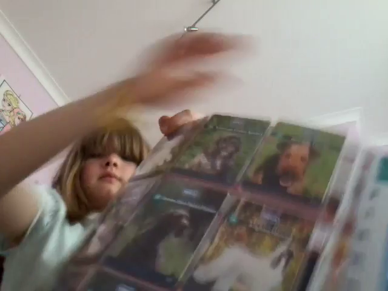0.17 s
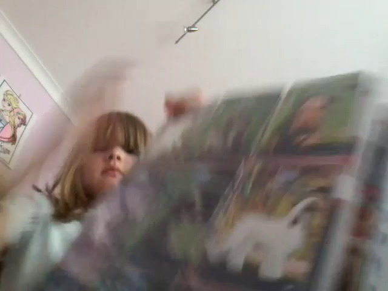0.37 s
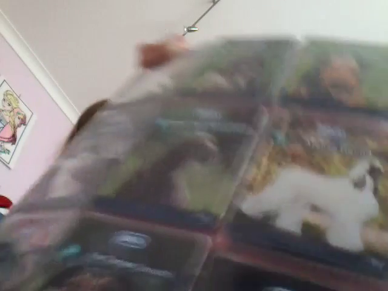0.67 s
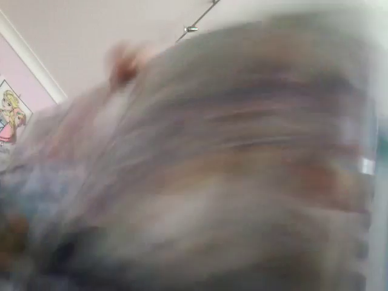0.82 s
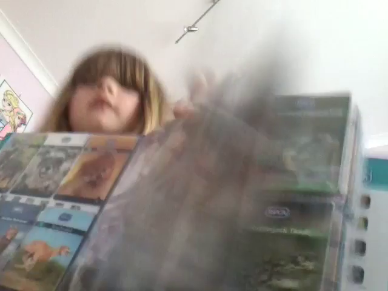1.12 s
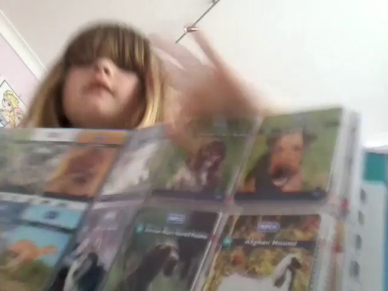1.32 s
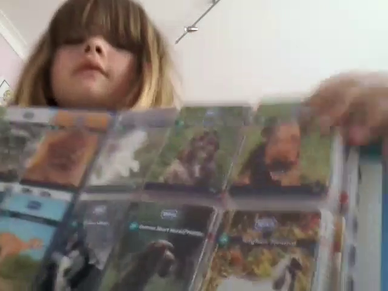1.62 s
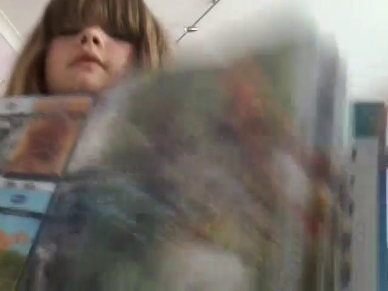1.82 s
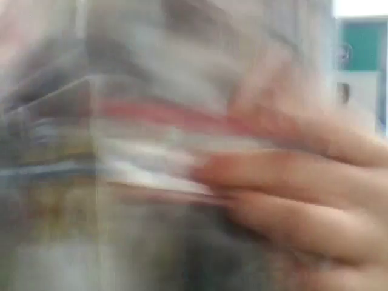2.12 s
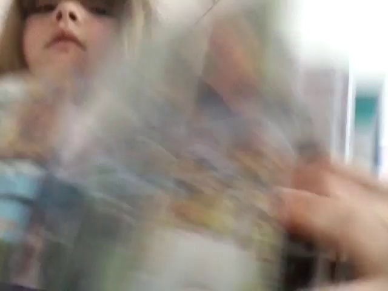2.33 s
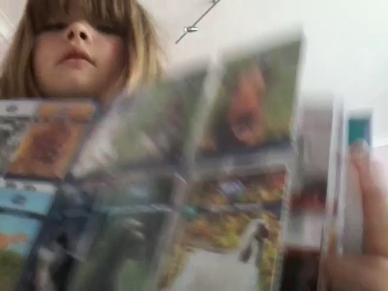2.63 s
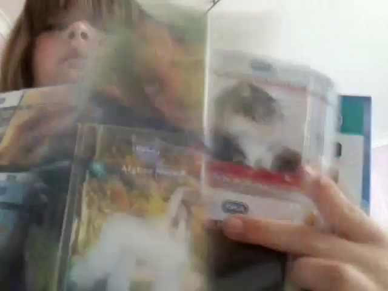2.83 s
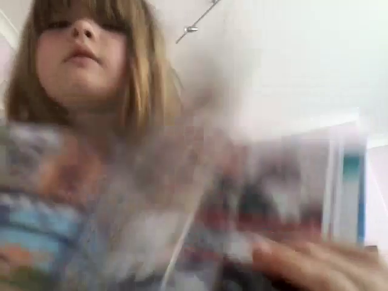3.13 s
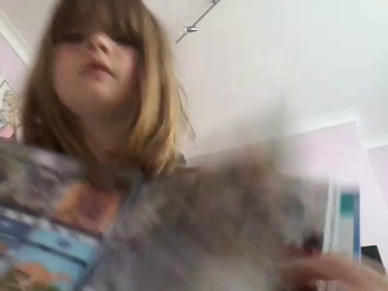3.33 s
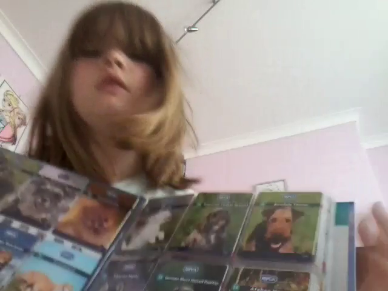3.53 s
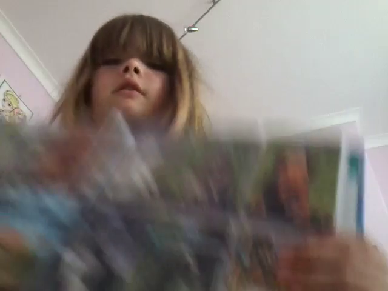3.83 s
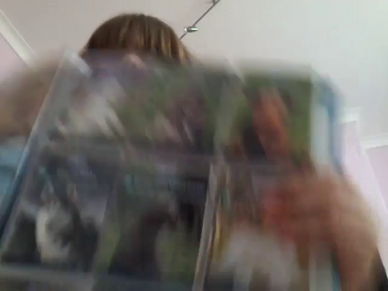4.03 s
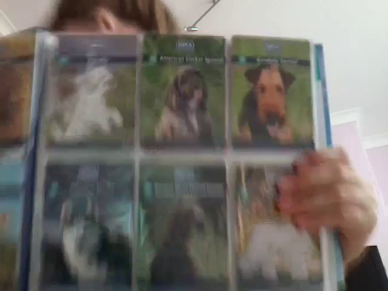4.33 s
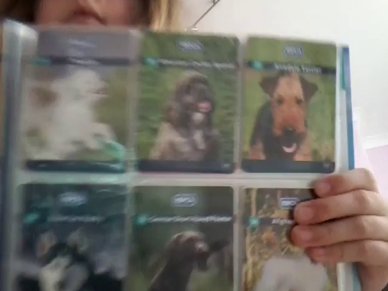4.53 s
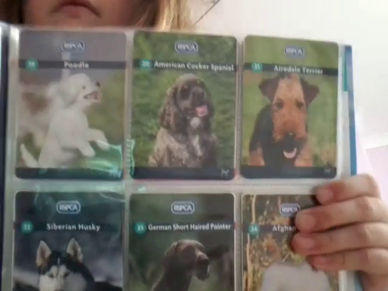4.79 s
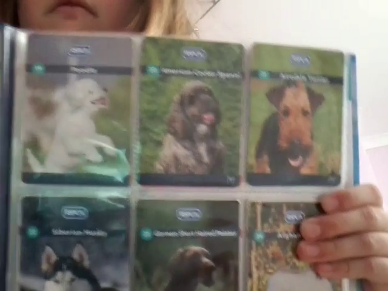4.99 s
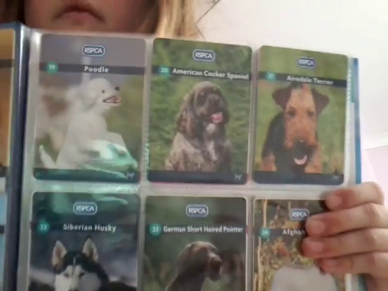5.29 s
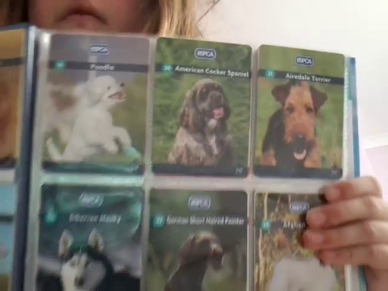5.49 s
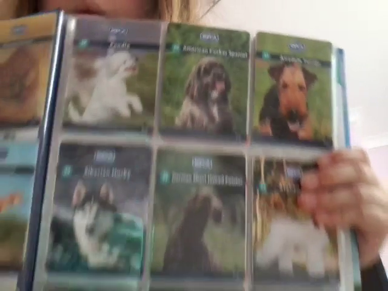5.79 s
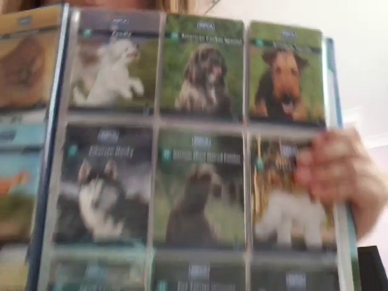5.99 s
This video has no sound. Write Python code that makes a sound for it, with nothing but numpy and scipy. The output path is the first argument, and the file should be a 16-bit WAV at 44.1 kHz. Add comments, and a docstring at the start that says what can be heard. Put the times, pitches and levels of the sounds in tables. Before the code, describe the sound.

Close, bright handling of plastic binder pages filled with cards, in a small bedroom with short reflections, over quiet steady low rumble and faint hiss. It opens with a faint fizz of film and two quick rubbing strokes by 0.2 s. After a lull, a light snap comes at about 0.7 s, and fuller flexing, scraping and crackling runs from 0.8 to 1.4 s. Softer rubs and ticks continue until creases crowd into a hard snap and page slap at 2.15 s, trailing crackles. Rustling thins, then the loudest, overloaded crack and heavy slap lands at 2.84 s with a puff of air. Swishing film follows to 3.2 s, where another snap sounds, with smaller clicks near 3.5 and 3.7 s. A rising, hoarse drag of taut plastic stops abruptly at 4.3 s. Afterwards it is nearly still, with small crinkles around 5.05, 5.5 and 5.6 s and a faint final glide.

```python
"""A faint fizz of rubbing film comes first, soon with sharper strokes and a light snap: plastic sleeve pages
full of cards are lifted, bent and turned in a binder, close to a small stereo camera in a bedroom.
Stick-slip clicks make the fizz, scrape and swishes; creases buckle as short ringing pulses; two heavy pages
slap down as decaying noise with a puff of air. The room answers briefly over steady rumble and hiss;
each microphone port rings at its own treble pitch, and the hardest snaps overload."""
import sys
import numpy as np
from scipy import signal
from scipy.fft import rfft, irfft, next_fast_len
from scipy.io import wavfile
from scipy.ndimage import map_coordinates

SR = 44100
rng = np.random.default_rng(int(sys.argv[2]) if len(sys.argv) > 2 else 0)


def log_audio(samples):
    """Write samples as a 16-bit WAV file to the path given in sys.argv[1]."""
    # one column per channel
    frames = np.atleast_2d(samples).T
    # limit to full scale, then quantise
    limited = np.clip(frames, -1, 1)
    pcm = np.round(limited * 32767).astype(np.int16)
    wavfile.write(sys.argv[1], SR, pcm)


N = 271215
TIME = np.arange(N) / SR

# the page lies to one side: lag of the right port, and its spread from crease to crease
LAG_MS, LAG_SPREAD_MS = .21, .1

SWELL_DB = 20  # a push gains this much over its rise and loses it over its fall
FLEX_SLOWER = 1.25  # the heavy page starts and stops more slowly than the film slides
HELD_FIZZ_DB, HELD_FLEX_DB = -76, -76  # the binder stirs even when only held

# pushes of the hand that slide and bend a page, levels before the mix: peak t/s, film rise t/s, film fall t/s,
# fizz level/dB, flex level/dB, scrape relative to fizz level/dB, left minus right level/dB
HAND_PUSHES = [(0.004, 0.101, 0.226, -56.5, -63.8, -12.0, -0.1),
               (0.139, 0.037, 0.014, -37.6, -52.6, -18.0, -1.0),
               (0.2, 0.051, 0.016, -33.3, -50.9, -18.0, -1.2),
               (0.426, 0.428, 0.206, -57.6, -58.6, -17.0, -0.2),
               (0.531, 0.014, 0.128, -50.1, -47.3, -16.0, -0.7),
               (0.674, 0.123, 0.065, -42.2, -45.2, -14.0, -1.6),
               (0.875, 0.11, 0.17, -37.5, -40.0, -8.0, -1.5), (0.945, 0.13, 0.075, -35.5, -46.0, -3.0, 1.0),
               (1.138, 0.096, 0.134, -43.3, -46.7, -8.0, -0.9),
               (1.274, 0.02, 0.199, -39.6, -44.8, -10.0, -0.2),
               (1.501, 0.126, 0.099, -42.2, -57.5, -26.0, -0.3),
               (1.604, 0.149, 0.228, -49.8, -61.2, -23.0, 1.3),
               (1.755, 0.109, 0.087, -42.3, -50.9, -10.0, -0.7),
               (1.901, 0.081, 0.621, -53.8, -55.3, -6.0, -0.9),
               (2.086, 0.012, 0.14, -40.5, -38.0, 1.0, -1.0),
               (2.144, 0.027, 0.049, -28.5, -31.3, -9.0, -0.1),
               (2.369, 0.559, 0.475, -49.8, -51.3, -19.0, -0.9),
               (2.563, 0.044, 0.094, -45.4, -45.1, -5.0, 0.9),
               (2.79, 0.01, 0.03, -39.0, -36.0, -17.0, -1.0),
               (2.858, 0.022, 0.068, -21.0, -26.5, -20.0, -2.0),
               (3.009, 0.146, 0.074, -32.3, -36.8, -14.0, -2.2),
               (3.131, 0.032, 0.072, -40.1, -45.5, -10.0, -4.1),
               (3.216, 0.067, 0.433, -53.0, -51.5, -10.0, -2.0),
               (3.475, 0.025, 0.083, -37.8, -45.9, -7.0, -1.2),
               (3.69, 0.006, 0.037, -44.4, -49.4, -5.0, -1.8), (3.751, 0.2, 0.45, -65.0, -64.0, -8.0, 2.0),
               (3.999, 0.134, 0.117, -49.5, -55.0, -9.0, -0.3),
               (4.324, 0.066, 0.02, -29.5, -44.0, -13.0, -2.0),
               (4.442, 0.531, 0.525, -63.5, -65.8, -8.0, 3.2),
               (4.949, 0.021, 0.091, -57.7, -63.7, -11.0, 2.1),
               (5.08, 0.061, 0.053, -43.4, -54.7, -17.0, -1.5),
               (5.15, 0.073, 0.234, -60.2, -66.7, -7.0, 4.4),
               (5.511, 0.058, 0.073, -51.8, -61.4, -11.0, 0.6),
               (5.623, 0.081, 0.36, -51.5, -58.0, -8.0, 1.0)]


def handling():
    """Power addition of incoherent sources: overlapping pushes set the fizz, scrape and flex gains per port."""
    fizz_power, scrape_power, flex_power = np.zeros((3, 2, N))
    for peak_s, rise_s, fall_s, fizz_db, flex_db, scrape_db, pan_db in HAND_PUSHES:
        pan = panned(pan_db)
        slide = (swell(peak_s, rise_s, fall_s, fizz_db) * pan) ** 2
        bend = (swell(peak_s, rise_s * FLEX_SLOWER, fall_s * FLEX_SLOWER, flex_db) * pan) ** 2
        fizz_power += slide
        scrape_power += slide * amp(scrape_db) ** 2
        flex_power += bend
    fizz = np.sqrt(fizz_power + amp(HELD_FIZZ_DB) ** 2)
    flex = np.sqrt(flex_power + amp(HELD_FLEX_DB) ** 2)
    return fizz, np.sqrt(scrape_power), flex


# relative spectrum of film sliding on film: f/Hz, level/dB per Hz
FIZZ_SPECTRUM = [(300, -35), (1200, -21), (2400, -4), (3200, -8), (4600, -1.5), (5800, -3.5), (7000, -1.3),
                 (8500, -2), (11000, 2), (14500, 2)]
# relative spectrum of scraping card edges: f/Hz, level/dB per Hz
SCRAPE_SPECTRUM = [(300, -16.5), (1000, -14), (1600, -1), (2300, -2), (3000, .5), (4200, 0), (6000, -11),
                   (12000, -14.5)]
# relative spectrum of the flexing card-filled page: f/Hz, level/dB per Hz
FLEX_SPECTRUM = [(40, -32.5), (130, -3.5), (300, -1), (700, -2.2), (1300, -9), (2000, -14), (4000, -17),
                 (10000, -42)]


def rubbing(fizz_gain, scrape_gain, flex_gain):
    """Stick-slip friction: film slides in uneven spurts, card edges scrape and the heavy page flexes."""
    spurt = amp(1.9 * wander(per_s=140))  # rms swing in dB
    fizz_slips = slips(per_s=1700, spread_db=3, smooth=0.39)
    scrape_slips = slips(per_s=900, spread_db=4, smooth=.45)
    flex_slips = slips(per_s=400, spread_db=1.0, smooth=0.63)
    fizz = at_ports(shaped(fizz_slips, FIZZ_SPECTRUM), LAG_MS, diffuse=0.96)
    scrape = at_ports(shaped(scrape_slips, SCRAPE_SPECTRUM), LAG_MS, diffuse=0.44)
    flex = at_ports(shaped(flex_slips, FLEX_SPECTRUM), LAG_MS, diffuse=0.18)
    driven = fizz * fizz_gain + scrape * scrape_gain + flex * flex_gain
    return amp(-3.2) * spurt * driven


def slips(per_s, spread_db, smooth):
    """Stick-slip: three trains of tiny random clicks, a few of them large, over smooth sliding noise."""
    size = amp(spread_db * np.minimum(rng.exponential(1, (3, N)), 4))
    happens = rng.random((3, N)) < per_s / SR
    clicks = size * happens * rng.choice([-1, 1], (3, N))
    return evened(clicks) + smooth * rng.standard_normal((3, N))


# single buckling creases, from faint ticks to hard snaps, level of the direct pulse before panning:
# t/s, energy level/dB, panel ring f/Hz, flip corner f/Hz, lag of the right port t/ms, left minus right level/dB
SINGLE_SNAPS = [(0.1149, -20.2, 2110.0, 20000.0, 0.16, -2.0), (0.6359, -22.1, 1240.0, 3500.0, 0.12, -1.0),
                (0.6583, -22.1, 590.0, 8900.0, 0.12, 4.0), (0.6811, -9.0, 1500.0, 1800.0, 0.26, 0.0),
                (0.8303, -13.5, 1900.0, 1000.0, 0.3, -1.0), (0.9244, -16.2, 730.0, 7900.0, -0.14, -1.0),
                (0.9847, -20.0, 1120.0, 11000.0, 0.2, 2.0), (1.0114, -15.0, 500.0, 9000.0, 0.15, 2.0),
                (1.1145, -24.4, 1120.0, 2200.0, 0.18, 4.0), (1.1724, -29.0, 1720.0, 3270.0, 0.2, -4.0),
                (1.2755, -25.3, 910.0, 14100.0, 0.06, 0.0), (1.3415, -22.4, 350.0, 20000.0, 0.1, -2.0),
                (1.3729, -12.5, 350.0, 20000.0, 0.12, 3.0), (1.5836, -25.6, 500.0, 2200.0, 0.12, -3.0),
                (1.6951, -26.8, 2350.0, 20000.0, 0.28, -4.0), (1.7739, -21.7, 3580.0, 20000.0, 0.28, 4.0),
                (1.8736, -24.7, 1380.0, 900.0, 0.02, -1.0), (1.9202, -16.0, 2900.0, 20000.0, 0.06, -6.0),
                (1.9877, -16.5, 350.0, 3500.0, 0.2, -5.0), (2.0324, -12.0, 1540.0, 20000.0, -0.02, 2.0),
                (2.0792, -6.0, 350.0, 20000.0, 0.2, 2.0), (2.0927, -15.8, 1010.0, 11200.0, 0.18, 3.0),
                (2.1113, -10.8, 350.0, 4500.0, 0.24, 4.0), (2.1397, 6.0, 6500.0, 20000.0, -0.12, -1.0),
                (2.1493, 0.0, 430.0, 2900.0, 0.25, 3.0), (2.1726, -7.0, 550.0, 700.0, 0.36, 1.0),
                (2.1836, -10.5, 660.0, 700.0, 0.32, -6.0), (2.1943, -8.5, 1120.0, 7100.0, 0.12, 0.0),
                (2.2156, -13.1, 590.0, 1400.0, 0.26, 1.0), (2.2385, -6.8, 430.0, 8900.0, 0.26, 2.0),
                (2.2781, -15.5, 450.0, 5500.0, 0.22, 5.0), (2.3378, -18.3, 820.0, 12600.0, 0.2, 2.0),
                (2.3878, -21.7, 730.0, 2500.0, 0.2, -2.0), (2.3932, -21.0, 1120.0, 2200.0, 0.14, 4.0),
                (2.4369, -27.6, 1380.0, 700.0, 0.18, 11.0), (2.4857, -22.8, 1010.0, 700.0, 0.2, 0.0),
                (2.5289, -13.0, 530.0, 8900.0, 0.18, -1.0), (2.5558, -16.4, 530.0, 8900.0, 0.12, 2.0),
                (2.7364, -25.0, 700.0, 700.0, 0.2, -2.0), (2.7953, -10.0, 6750.0, 1200.0, 0.2, 3.0),
                (2.8293, -10.3, 1380.0, 700.0, 0.18, 3.0), (2.8408, 3.0, 820.0, 10000.0, 0.14, -1.0),
                (2.8434, 12.5, 5400.0, 15000.0, 0.1, -1.0), (2.8451, 6.0, 400.0, 20000.0, 0.1, 1.0),
                (2.8619, -1.0, 730.0, 7000.0, -0.04, -2.0), (2.9295, -10.0, 590.0, 4500.0, 0.24, 1.0),
                (2.9671, -11.7, 590.0, 5000.0, 0.08, -3.0), (2.9989, -14.3, 730.0, 4000.0, 0.2, -2.0),
                (3.2266, -5.0, 950.0, 2700.0, 0.2, -1.0), (3.4723, -17.0, 3220.0, 20000.0, 0.3, -1.0),
                (3.4779, -9.3, 2900.0, 2000.0, 0.06, -3.0), (3.4828, -12.2, 350.0, 20000.0, 0.16, -4.0),
                (3.6944, -23.4, 350.0, 5000.0, 0.06, -2.0), (3.9036, -37.0, 2000.0, 1500.0, 0.2, -2.0),
                (4.6223, -42.0, 1000.0, 10000.0, 0.16, -2.0), (4.9433, -25.5, 600.0, 5600.0, 0.2, 1.0),
                (5.0152, -26.0, 1200.0, 6000.0, 0.26, 1.0), (5.0296, -24.6, 2500.0, 20000.0, 0.16, 1.0),
                (5.0793, -22.3, 7500.0, 1100.0, -0.32, -5.0), (5.5158, -28.8, 4420.0, 20000.0, -0.02, -2.0),
                (5.6311, -28.0, 1500.0, 14000.0, 0.06, -2.0)]


def snaps(q=1.7, gentle_q=1.3, bounce_db=-9):
    """Snap-through buckling: the gentler the flip, the purer the ring; the card behind throws each one back."""
    out = np.zeros((2, N))
    for s, db, hz, flip_hz, lag_ms, pan_db in SINGLE_SNAPS:
        pulse = crease(hz, flip_hz, lag_ms, q + gentle_q * min(hz / flip_hz, 1))
        sheet = shiver(ring_db=-10, ring_t60=0.017)
        bounce_s = rng.uniform(.0003, .0008)
        sheet[:, round(bounce_s * SR)] += amp(bounce_db)
        snap = signal.fftconvolve(pulse, sheet, axes=1)
        add(out, s - 16 / SR, amp(db) * panned(pan_db) * snap)  # undoes the lead-in of crease()
    return out


def crease(hz, flip_hz, lag_ms, q, size=512):
    """Damped resonance: a panel flips and rings a few cycles, a slow flip dully. Unit energy at the left port."""
    f = np.fft.rfftfreq(size, 1 / SR)
    panel, flip = 1j * f / hz, 1j * f / flip_hz
    ring = panel ** 2 / (1 + panel / q + panel ** 2)
    flip_low_pass = 1 / (1 + np.sqrt(2) * flip + flip ** 2)
    band_limit = 1 / (1 + (f / EDGE_HZ) ** 16)
    delay = 16 / SR + np.array([[-.5], [.5]]) * lag_ms / 1000  # 16 samples of lead-in
    pulse = irfft(ring * flip_low_pass * band_limit * np.exp(-2j * np.pi * f * delay))
    return pulse / np.linalg.norm(pulse[0])


def shiver(ring_db, ring_t60, size=1024):
    """Exponential decay: a direct unit pulse, then the brief rattle of the sheet around it."""
    sheet = rng.standard_normal((2, size)) * amp(-60 * np.arange(size) / SR / ring_t60)
    sheet *= amp(ring_db) / np.linalg.norm(sheet[0])
    sheet[:, 0] = 1
    return sheet


# pages landing on the stack: t/s, thud energy level/dB, t60 t/s, puff energy level/dB (both at the left port)
PAGE_SLAPS = [(2.147, .5, 0.11, -25), (2.843, -1.5, 0.22, -5)]
# relative spectrum of the thud: f/Hz, level/dB per Hz
SLAP_SPECTRUM = [(20, -8), (60, -12.5), (130, -3), (230, -4), (500, 8.5), (1000, 0.5), (2000, -12),
                 (6000, -21.5)]


def slaps(apart=0.26, push_s=0.0023):
    """Impact and air displacement: the cards thud into the stack and push a puff of air onto the ports."""
    out, t = np.zeros((2, N)), np.arange(SR // 2) / SR
    puff = (1 - t / push_s) * np.exp(-t / push_s) * np.array([[1], [-.5]])
    puff /= np.linalg.norm(puff[0])
    for s, db, t60, puff_db in PAGE_SLAPS:
        # mostly shared by the ports, partly each port's own
        noise = rng.standard_normal(len(t)) + apart * rng.standard_normal((2, len(t)))
        thud = shaped(noise, SLAP_SPECTRUM) * amp(-60 * t / t60)
        add(out, s, amp(db) * thud / np.linalg.norm(thud[0]) + amp(puff_db) * puff)
    return out


# a bent page relaxes in small dull pops: peak t/s, rise t/s, fall t/s, peak level/dB before the bend weighting
RELAXING = (2.45, .5, .9, -60)


def small_creases(fizz, flex):
    """Buckling threshold: dull flaps follow the flexing, bright ticks the sliding; a barely bent page is quiet."""
    bent = flex / (flex + amp(-64))
    flaps = crinkle(per_s=57, spread_db=4, low_hz=523, high_hz=1700, reach=0.77, q=3)
    ticks = crinkle(per_s=70, spread_db=1.4, low_hz=1200, high_hz=6030, reach=3, q=1.6)
    flaps = flaps * (amp(-8.5) * flex + swell(*RELAXING))
    ticks = ticks * amp(-11.5) * fizz
    return signal.oaconvolve(bent * (flaps + ticks), shiver(ring_db=-7, ring_t60=.018), axes=1)[:, :N]


def crinkle(per_s, spread_db, low_hz, high_hz, reach, q, count=24):
    """Random-impulse noise: small creases of many sizes pop, each with its flip corner at reach times its pitch."""
    out = np.zeros((2, N))
    size = amp(spread_db * np.minimum(rng.exponential(1, N), 3))
    size = size * (rng.random(N) < per_s / SR)
    which = rng.integers(0, count, N)
    shapes = []
    for hz in np.geomspace(low_hz, high_hz, count):
        shapes.append(crease(hz, hz * reach, rng.normal(LAG_MS, LAG_SPREAD_MS), q))
    for i in np.flatnonzero(size):
        add(out, i / SR, size[i] * shapes[which[i]])
    return evened(out)


# a sleeve dragged taut whistles hoarsely: peak t/s, rise t/s, fall t/s, peak level/dB
TAUT_DRAG = (4.324, .06, .016, -40)
# its resonances: f/Hz, width f/Hz, relative level/dB
TAUT_MODES = [(450, 360, -8), (2170, 340, -2), (2724, 420, -4.5)]


def drag():
    """Friction-driven resonance: dense slips ring the modes of a taut sleeve."""
    drive, out = slips(per_s=4000, spread_db=3, smooth=0.4), 0
    for hz, width, db in TAUT_MODES:
        band = signal.iirpeak(hz, hz / width, SR)
        out = out + amp(db) * evened(signal.lfilter(*band, drive))
    return at_ports(evened(out), LAG_MS, diffuse=0.2) * swell(*TAUT_DRAG)


# one smooth sleeve glides over another: start t/s, end t/s, level/dB
GLIDES = [(1.45, 1.54, -49), (1.898, 1.975, -59), (2.572, 2.65, -51.5), (2.93, 3.062, -42.5),
          (3.117, 3.182, -44), (3.96, 4.1, -65), (5.61, 5.87, -62.5)]
# relative spectrum of its fine hiss: f/Hz, level/dB per Hz
GLIDE_SPECTRUM = [(1000, -34), (3800, -18.5), (5000, -7.5), (5750, -1.5), (6500, -6), (8500, -5.5),
                  (14000, -6.5)]


def swishes(taper=.7):
    """Fine-grained friction: very fast slips swell and stop with each glide."""
    level = np.zeros((1, N))
    for start, end, db in GLIDES:
        length = max(round((end - start) * SR), 2)
        add(level, start, amp(db) * signal.windows.tukey(length, taper)[None])
    fine_slips = slips(per_s=5000, spread_db=3.5, smooth=.6)[:2]
    return level * shaped(fine_slips, GLIDE_SPECTRUM)


def scene():
    """Superposition: pushes drive rubbing and small creases, snaps and slaps are added, the room answers."""
    fizz, scrape, flex = handling()
    rustle = rubbing(fizz, scrape, flex) + drag() + swishes() + small_creases(fizz, flex)
    hits = snaps() + slaps()
    return rustle + hits + amp(-9.5) * room(rustle) + amp(-15) * room(hits)


# reverberation of the bedroom: f/Hz, t60 t/s
BEDROOM = [(150, .45), (700, 0.19), (2000, 0.36), (6000, 0.29), (14000, 0.48)]


def room(x, first_s=0.0064):
    """Reverberation: a dense tail of reflections, fading in around first_s, each band dying at its own speed."""
    hz, t, z = signal.stft(rng.standard_normal((2, SR // 2)), SR, nperseg=256)
    decay = amp(-60 * t / read(BEDROOM, hz)[:, None])
    tail = signal.istft(z * decay, SR, nperseg=256)[1]
    tail *= np.clip(np.arange(tail.shape[1]) / SR / first_s - .5, 0, 1)
    return signal.fftconvolve(x, tail / np.linalg.norm(tail[0]), axes=1)[:, :N]


# relative spectrum of the steady rumble and hiss: f/Hz, level/dB per Hz
HUSH_SPECTRUM = [(15, -7.5), (40, -3.5), (85, 3), (150, -0.5), (300, -8.5), (600, -16.5), (1200, -22),
                 (3000, -28.5), (6000, -41), (9000, -25), (14500, -21)]


def hush():
    """Stationary noise: steady rumble and hiss, independent at the ports and 2 dB stronger at the left."""
    return amp(-63) * shaped(rng.standard_normal((2, N)), HUSH_SPECTRUM) * amp([[1], [-1]])


BAND_HZ, EDGE_HZ = 14500, 15500  # band limits before and after the overload
# microphone ports, left then right: resonance f/Hz, sharpness Q, gain level/dB, treble roll-off f/Hz
MIC_PORTS = [(7444, 2.6, 1, 170000), (5826, 7.2, -1.5, 20000)]


def record(dry):
    """Port resonance and clipping: two ports of opposite polarity, background noise, overload, band limit."""
    size = next_fast_len(N + 2048)
    f = np.fft.rfftfreq(size, 1 / SR)
    ports = []
    for hz, q, db, top_hz in MIC_PORTS:
        resonance = 1 / (1 - (f / hz) ** 2 + 1j * f / hz / q)
        ports.append(amp(db) * resonance / (1 + 1j * f / top_hz))
    heard = irfft(rfft(dry, size) * np.array(ports), size)[:, :N] * np.array([[1], [-1]])
    overloaded = np.clip(low_pass(heard + hush(), BAND_HZ), -1, 1)
    return low_pass(overloaded, EDGE_HZ)


def low_pass(x, hz):
    """Band limiting: a steep elliptic filter."""
    return signal.sosfilt(signal.ellip(10, .1, 70, hz, fs=SR, output="sos"), x)


def at_ports(x, lag_ms, diffuse):
    """Direct and diffuse field: the touched spot lags at the right port; the rest of the page is uncorrelated."""
    spot, left, right = x
    late = map_coordinates(spot, [np.arange(N) - lag_ms * SR / 1000], order=3)
    share = np.clip(diffuse, 0, 1)
    return np.sqrt(1 - share) * np.array([spot, late]) + np.sqrt(share) * np.array([left, right])


def panned(db):
    """Level difference between the ports: left minus right, split evenly."""
    return amp(np.array([[.5], [-.5]]) * db)


def swell(peak_s, rise_s, fall_s, db):
    """Exponential growth and decay: one movement's gain is linear in dB up to its peak and away from it."""
    away = np.maximum((peak_s - TIME) / rise_s, (TIME - peak_s) / fall_s)
    return amp(db - np.minimum(SWELL_DB * away, 200))


def wander(per_s):
    """Random modulation: straight lines between per_s chance values a second, unit rms."""
    knots = rng.standard_normal(4096)
    return evened(np.interp(TIME * per_s, np.arange(len(knots)), knots))


def shaped(x, spectrum, size=4096):
    """Minimum-phase filtering: a causal filter with this magnitude spectrum; unit rms."""
    log_gain = np.log(amp(read(spectrum, abs(np.fft.fftfreq(size, 1 / SR)))))
    # the Hilbert transform of the log gain gives the phase
    response = np.fft.ifft(np.exp(np.conj(signal.hilbert(log_gain)))).real[:size // 2]
    return evened(signal.oaconvolve(x, response[None], axes=1)[:, :x.shape[1]])


def read(points, hz):
    """Logarithmic frequency scale: joins table points by straight lines on it."""
    f, value = np.transpose(points)
    return np.interp(np.log(hz + 1), np.log(f + 1), value)


def amp(db):
    """Decibel law: level to amplitude ratio."""
    return 10 ** (np.asarray(db) / 20)


def evened(x):
    """Normalization to unit rms."""
    return x / np.sqrt(np.mean(x ** 2) + 1e-20)


def add(mix, s, sound):
    """Linear superposition: adds a sound into the mix from s seconds on."""
    part = mix[:, max(round(s * SR), 0):][:, :sound.shape[1]]
    part += sound[:, :part.shape[1]]


dry = scene()
out = record(dry)
log_audio(out)
```